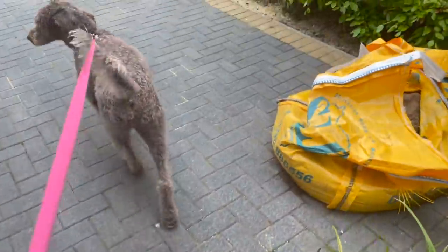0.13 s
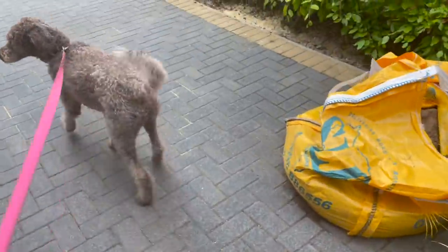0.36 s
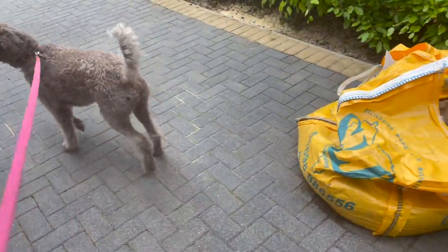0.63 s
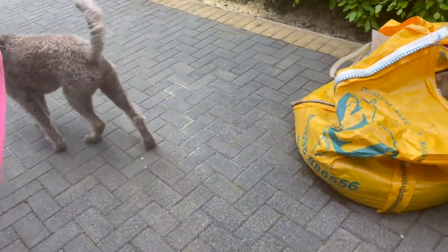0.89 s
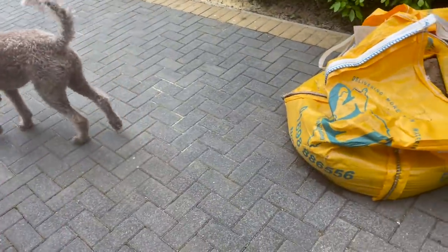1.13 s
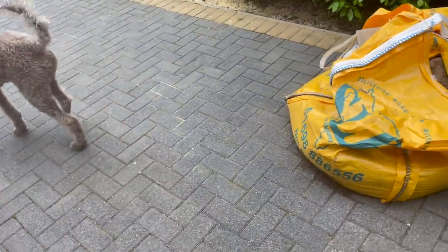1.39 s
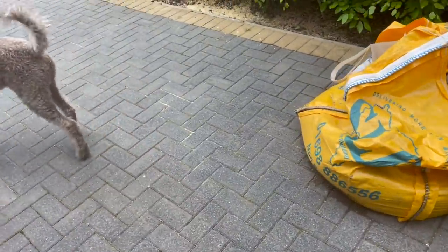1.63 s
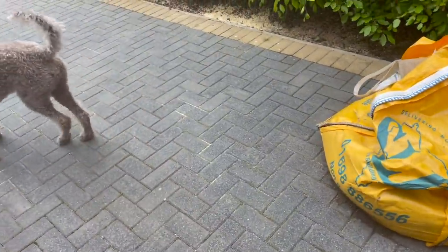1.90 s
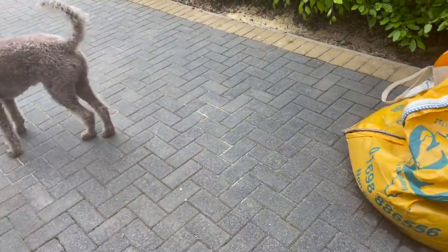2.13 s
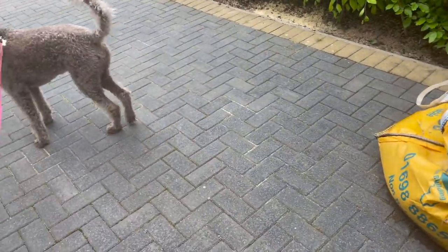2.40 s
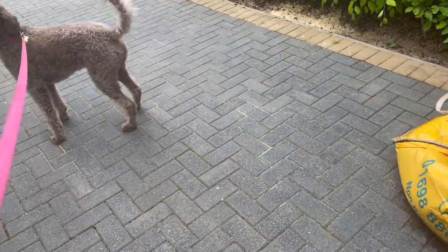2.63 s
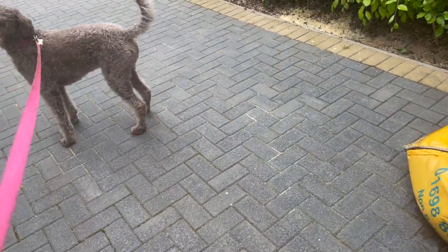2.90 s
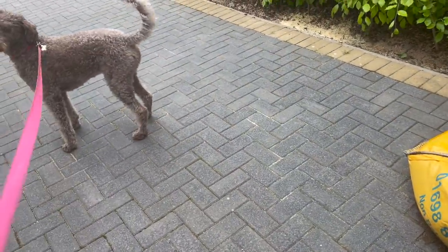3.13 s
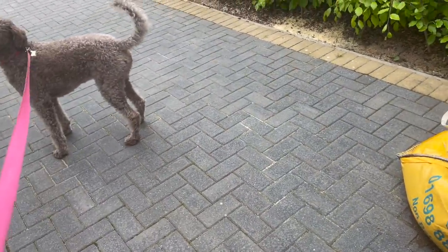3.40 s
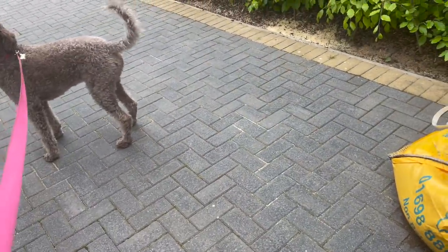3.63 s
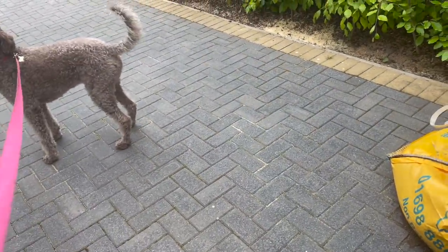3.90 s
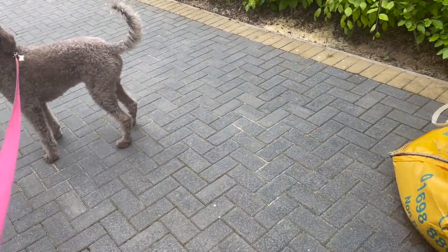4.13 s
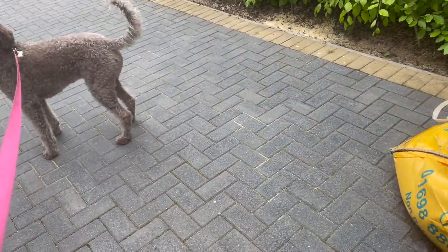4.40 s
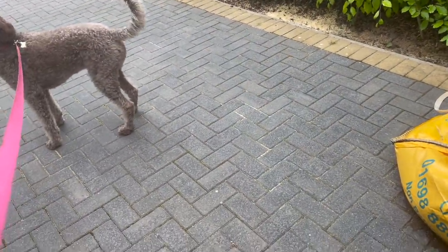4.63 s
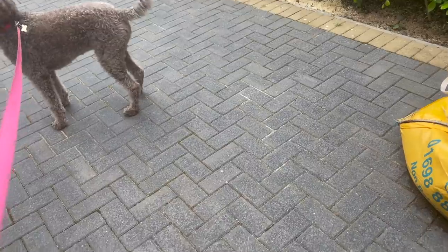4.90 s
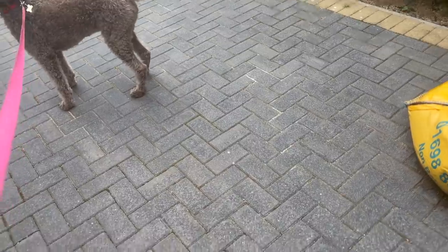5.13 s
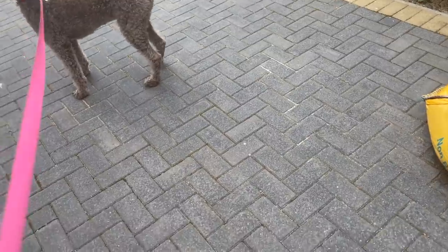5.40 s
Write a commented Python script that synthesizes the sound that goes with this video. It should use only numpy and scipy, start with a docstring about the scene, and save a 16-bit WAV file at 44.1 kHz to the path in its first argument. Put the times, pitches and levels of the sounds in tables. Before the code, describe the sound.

Irregular clicking taps and gritty scuffs of feet and dog paws on paving blocks outdoors, sparse mid-way, then crowding together near the end.

```python
"""A person and a dog shift about on paving blocks, close below a hand-held phone.
From the start, filtered-noise outdoor hiss, bass stirred by hand and wind, and dragged grit made of ringing grains.
At 0.1 s the fur swishes and taps begin: each tap is a click and crack, a spray of grit and small ringing stones.
A flurry with dull knocks (decaying sines) ends at 0.8 s; steps stay sparse until 3.3 s, a loose block rocking at 2.8 s.
Steps crowd together from 3.9 to 5.2 s, then dragging, bass and hiss are left until 5.5 s."""
import sys
import numpy as np
from scipy import signal
from scipy.fft import rfft, irfft
from scipy.io import wavfile
from scipy.ndimage import uniform_filter1d

SR = 44100
rng = np.random.default_rng(int(sys.argv[2]) if len(sys.argv) > 2 else 0)


def waveform_to_disk(signal):
    """Save audio, clipped to [-1, 1], as 16-bit WAV at the path in sys.argv[1]."""
    frames = np.transpose(np.atleast_2d(signal))
    scaled = np.clip(frames, -1, 1) * 32767
    samples = np.round(scaled).astype(np.int16)
    wavfile.write(sys.argv[1], SR, samples)


def how_loud(loudness_db):
    """Turn decibels into a plain amplitude multiplier (0 dB gives 1, 20 dB gives 10)."""
    steps = np.asarray(loudness_db, float) / 20
    return 10 ** steps


N = 243341
TIME = np.arange(N) / SR
BIN_HZ = np.maximum(np.arange(N // 2 + 1) * SR / N, 1)

# distant outdoor hiss, spectrum: f/Hz, gain/dB
AIR_SPECTRUM = [(88, -20.5), (150, -1), (240, -2.5), (1260, -7.5), (2180, -22), (3920, -6.5), (4860, -23),
                (8230, -33.5), (13200, -30), (16000, -52)]
# bass from the hand and the wind on the phone: t/s, level/dB, part above 100 Hz re level/dB
HANDLING = [(0.0, -64, 10), (0.3, -73.5, 13.5), (0.581, -54.5, -9), (0.78, -53.5, -6), (1.11, -65.5, -6),
            (1.35, -60.5, -8.5), (1.43, -53, 0.5), (1.69, -65.5, -1.5), (2.0, -60, -9), (2.55, -75, 6),
            (2.9, -60, -13), (3.05, -65, -31), (3.16, -58.5, -12), (3.6, -69, 2), (3.89, -63, -9),
            (4.06, -50, -3), (4.179, -60, 10), (4.28, -33, -6.5), (4.36, -49.5, 0), (4.45, -47, -5.5),
            (4.601, -52, 0), (4.72, -47, 0.5), (4.9, -45.5, 5), (5.1, -52.5, 7.5), (5.38, -51.5, -11),
            (5.52, -54.5, -7)]
# dragging soles and paws: t/s, level/dB, treble re level/dB
DRAG = [(0.0, -53.5, -4.5), (0.17, -65, -6), (0.34, -62, 6.5), (0.66, -66, -3), (0.85, -58, 3),
        (1.05, -69, 0.5), (1.3, -70, -7.5), (1.6, -71, -18.5), (2.01, -68.5, -2), (2.2, -74.5, -6),
        (2.4, -75.5, -1.5), (2.7, -79.5, -8), (2.86, -82, 2), (3.1, -75, -33), (3.44, -73, -20),
        (3.56, -50, -18.5), (3.72, -73.5, -18), (3.949, -68.5, -8), (4.08, -49, 0), (4.16, -57.5, -11.5),
        (4.32, -54.5, -16.5), (4.55, -71.5, -21.5), (4.88, -47, -13.5), (5.09, -54.5, -12.5),
        (5.29, -66.5, -10), (5.52, -71, -2)]
# colour of the crushed grit: f/Hz, gain/dB
GRIT_SPECTRUM = [(88, -26), (150, 4), (330, -4.5), (450, -7.5), (640, -5), (950, -1), (1830, -4.5),
                 (2300, -3), (3500, -7), (5500, -11), (7600, -16.5), (10000, -17), (13400, -19),
                 (16000, -32)]
# resonances of sole and block: f/Hz, width/Hz, gain/dB
BLOCK_MODES = [(354, 100, 3), (634.5, 3.3, 12.5), (1030, 6.9, 6.5), (1490, 48, -0.5), (2060, 60, 1),
               (2810, 36, 9.5), (4260, 180, -12), (4360, 170, 7.5), (7350, 41, 6)]
# soft bright swishes, fur or lead brushing past: t/s, level/dB, bite re level/dB, fade/dB per 50 ms
SWISHES = [(0.094, -49, -57, 10), (0.164, -46, -9, 23), (0.525, -46, -22, 37), (0.624, -47, -21, 27),
           (0.983, -47.5, -5, 46), (1.371, -56, -26, 8), (1.644, -55, -4, 26), (1.749, -59.5, -2, 25),
           (2.359, -65, 7, 29.5), (2.504, -57.5, -6, 34), (2.554, -55, -5.5, 12.5), (2.612, -59, 1, 28.5),
           (3.284, -69.5, -5, 19), (3.473, -57, 0, 32)]
# footfalls and claw ticks: t/s, level/dB, ring f/Hz, treble re level/dB, fade/dB per 50 ms
STEPS = [(0.095, -50, 1390, 5.5, 31), (0.212, -44.5, 1020, -24, 31.5), (0.276, -35, 2810, -22, 28),
         (0.286, -16.5, 2820, -10.5, 20), (0.299, -25.5, 2990, -24, 13), (0.351, -26.5, 1470, -11.5, 20.5),
         (0.444, -38.5, 870, -17, 35), (0.502, -39.5, 1057, -20, 52), (0.679, -30, 960, -23, 13.5),
         (0.752, -22.5, 1940, -39.5, 13.5), (0.788, -21.5, 1030, -16.5, 20), (0.8, -26, 1090, -27, 15),
         (1.409, -52, 2120, -24, 3), (1.47, -41.5, 717, -36, 8), (1.502, -57, 1020, -16, 30),
         (1.884, -22.5, 1555, -23, 17.5), (2.055, -35, 1080, -23, 12), (2.099, -37.5, 1030, -22, 27),
         (2.623, -43.5, 1940, -10.5, 59), (2.772, -40, 2043, -47, 17), (2.858, -46.5, 1090, -32, 16),
         (3.145, -53, 900, -48, 28), (3.308, -54, 1690, -18, 31), (3.401, -27, 2270, -55, 21),
         (3.441, -35.5, 2230, -45, 17), (3.459, -38.5, 1002, -37, 19.5), (3.544, -43.5, 4300, -30, 11),
         (3.57, -35, 2270, -35, 15), (3.592, -26, 1520, -42, 19.5), (3.912, -25, 2336, -14.5, 9),
         (3.953, -24, 790, -26, 7), (3.976, -18.5, 1004, -12, 21), (4.0, -22.5, 2163, -19, 10.5),
         (4.03, -25.5, 1030, -23, 33), (4.047, -23, 1970, -18, 32), (4.06, -20.5, 1020, -27, 28),
         (4.082, -28.5, 1030, -28, 30), (4.183, -15.5, 2060, -24.5, 33), (4.191, -23, 2170, -22.5, 17),
         (4.228, -29, 1525, -19.5, 15.5), (4.268, -28.5, 1490, -39.5, 27), (4.36, -36.5, 2110, -40.5, 30),
         (4.518, -38, 1400, -16, 13), (4.664, -45, 2100, -36, 43), (4.696, -13.5, 2106, -17, 12),
         (4.728, -19, 1466, -20, 40), (4.742, -20, 650, -19, 16.5), (4.784, -23.5, 1400, -21, 34),
         (4.865, -27, 1390, -21.5, 27), (4.97, -28, 2215, -46, 40), (5.03, -31, 1500, -36, 21),
         (5.079, -36.5, 1380, -35, 60), (5.176, -42, 685, -35, 23)]
# dull knocks: t/s, level/dB, f/Hz, t60/s
KNOCKS = [(.292, -23.5, 291.5, 0.093), (0.622, -15, 134, 0.034), (1.471, -35.5, 428, 0.13),
          (4.196, -11, 162, 0.043)]
# a loose block rocks under some steps: t/s, level/dB
LOOSE_BLOCK = [(2.776, -49), (3.405, -39.5), (4.186, -26.5), (4.719, -29)]
# stereo width of two microphone ports: f/Hz, side re mid/dB
WIDTH = [(30, -25), (125, -17), (250, -14.5), (500, -4.5), (1000, -2.5), (2000, -11.5), (4000, -4),
         (6000, -5.5), (8000, -2), (10500, 0), (12500, -5), (14000, -4), (16000, -0.5)]
# how the side follows the mid: f/Hz, share in step, share a quarter cycle ahead
PORT_PHASE = [(60, .05, .3), (250, .45, .3), (614, 0.45, 0.5), (1200, 0.49, 0.35), (2360, 0.21, 0.24),
              (4450, .05, 0.68), (8000, 0.034, 0.64), (13000, .05, 0.65)]
# the ports oppose each other here: f/Hz, mid gain/dB
CANCEL = [(7600, -2.5), (8300, -7.5), (8900, -21), (10700, -20.5), (11500, -9), (12200, -6), (15000, 4),
          (16200, -16)]

SPRAY_DB = -3.5  # grit thrown by a footfall, re its tap


def along(table, column=1):
    """A spectrum column at every bin, straight on a log-frequency axis."""
    table = np.array(table, float)
    return np.interp(np.log(BIN_HZ), np.log(table[:, 0]), table[:, column])


def shape(x, gain):
    """Filter by a gain per bin."""
    return irfft(rfft(x) * gain, N)


def band(lo_hz, hi_hz):
    """Gain of a steep band-pass."""
    return 1 / np.sqrt((1 + (lo_hz / BIN_HZ) ** 8) * (1 + (BIN_HZ / hi_hz) ** 8))


def unit(x):
    """Scale to rms 1."""
    return x / np.sqrt(np.mean(x ** 2))


def walk(rate):
    """Random wander: levels held for 1 / rate seconds, slewed twice, rms 1."""
    hold = int(SR / rate)
    levels = np.repeat(rng.standard_normal(N // hold + 1), hold)
    slewed = uniform_filter1d(uniform_filter1d(levels, hold), hold)
    return unit(slewed[:N])


def ring(x, hz, width):
    """One resonance, gain 1 at its centre."""
    return signal.lfilter(*signal.iirpeak(hz, hz / width, SR), x)


def fall(s, t60, rise):
    """Span of samples from s on, its own clock, and a fast rise with an exponential fall."""
    start = int(s * SR)
    t = TIME[:min(int(1.5 * t60 * SR) + 64, N - start)]
    env = (1 - np.exp(-t / rise)) * np.exp(-np.log(1000) * t / t60)
    return slice(start, start + len(t)), t, env


def lasting(fade_db):
    """Seconds to fall 60 dB at this fade per 50 ms, the fade kept within 6 to 90 dB."""
    return 60 * 0.05 / np.clip(fade_db, 6, 90)


def air():
    """Distant outdoor hiss: coloured noise whose level drifts a little."""
    hiss = unit(shape(rng.standard_normal(N), how_loud(along(AIR_SPECTRUM))))
    return hiss * how_loud(-69.5 + 2.9 * walk(6.3))


def shaking():
    """Levels of the low and the upper bass in dB, each wandering in quick gusts."""
    gust_db, gust_hz = 0.5, 8.0
    s, db, upper_db = np.transpose(HANDLING)
    return [np.interp(TIME, s, level) + gust_db * walk(gust_hz) for level in (db, db + upper_db)]


def handling(low_db, upper_db, weight):
    """Noise rumble from hand and wind; the weight on the ground adds thuds to the upper bass."""
    thud_db = -3.5  # re the weight layer
    low = unit(shape(rng.standard_normal(N), band(44, 98) ** 2))
    upper = unit(shape(rng.standard_normal(N), band(100, 206)))
    return low * how_loud(low_db) + upper * np.hypot(how_loud(upper_db), how_loud(thud_db) * weight)


def dragging(hand_db):
    """Power of weight, body, bite and treble as soles and paws drag; the hand's bass leaks into the weight."""
    s, db, treble_db = np.transpose(DRAG)
    # weight, body, bite: dB re level, and dB per dB of treble
    rel_db = [colour + tilt * treble_db for colour, tilt in ((-7.5, 0.1), (1, -0.055), (-2.5, 0.1))]
    power = np.array([how_loud(np.interp(TIME, s, db + rel)) ** 2 for rel in rel_db + [treble_db]])
    power[0] += how_loud(hand_db - 9) ** 2
    return power


def grit(crunch_db, own_db):
    """Grains crack in quick bunches, each size at its own pitch; returns weight, body, bite and treble."""
    bunches = crunch_db * walk(400)
    grains = 0
    for hz in 160 * 2 ** np.arange(0, 6.7, 1 / 3):  # third octaves
        cracks = rng.standard_normal(N) * how_loud(bunches + own_db * walk(60 + hz / 20))
        grains = grains + ring(cracks, hz, hz / 5)
    modes = 1
    for hz, width, db in BLOCK_MODES:
        modes = modes + (how_loud(db) - 1) / (1 + ((BIN_HZ - hz) * 2 / width) ** 2)
    x = shape(grains, how_loud(along(GRIT_SPECTRUM)) * modes)
    # the treble is scaled by its lower part alone
    treble = shape(x, band(5830, 14000)) / shape(x, band(5270, 7400)).std()
    lower = [unit(shape(x, band(*edges))) for edges in ((190, 570), (570, 1600), (1600, 4300))]
    return lower + [treble]


def swishes():
    """Grit-layer power of fur or lead brushing past: bite and treble swell softly and fade."""
    power = np.zeros((4, N))
    for s, db, bite_db, fade_db in SWISHES:
        span, t, env = fall(s, lasting(fade_db), 0.0057)
        power[2:, span] += (how_loud(db + np.array([[bite_db], [0]])) * env) ** 2
    return power


def sprays():
    """Grit-layer power thrown by each footfall: a brush beforehand, the spray, and a settling trickle."""
    settle_db, settle_t60_s = -31, 0.8  # level re the tap
    power = np.zeros((4, N))
    for s, db, hz, treble_db, fade_db in STEPS:
        tilt_db = 2.3 * np.log2(hz / 1600)  # a higher tap throws finer grit
        # dB re the tap, rise in s, stretch of the fade: the weight lands slowly and lingers
        layers = ((SPRAY_DB - 17.5, 0.008, 1.4),
                  (SPRAY_DB - 7.0 - tilt_db, 0.002, 1.1),
                  (SPRAY_DB - 9.5 + tilt_db, 0.001, 1.0),
                  (treble_db, 0.0005, 1.1))
        for row, (rel_db, rise, stretch) in enumerate(layers):
            span, t, env = fall(s, stretch * lasting(fade_db), rise)
            power[row, span] += (how_loud(db + rel_db) * env) ** 2
        span, t, env = fall(s, settle_t60_s, 0.036)
        power[:3, span] += (how_loud(db + settle_db) * env) ** 2
        # the sole brushes the grit for a moment before it lands
        lead = slice(span.start - 700, span.start)
        power[1:3, lead] += (how_loud(db - 16) * np.exp((TIME[lead] - s) / 0.0038)) ** 2
    return power


def taps():
    """The first contact cracks broadly and clicks a few cycles at its own pitch."""
    crack_db, lift_s = 4.5, 0.15  # a foot lifted for a while lands with a harder crack
    click, crack, hiss = np.zeros((3, N))
    noise = np.sign(rng.standard_normal(N))
    gaps = np.diff(np.array(STEPS)[:, 0], prepend=0)
    harder_db = crack_db * (1 - np.exp(-gaps / lift_s))
    phases = rng.random(len(STEPS))  # in turns
    for (s, db, hz, treble_db, _), hard_db, phase in zip(STEPS, harder_db, phases):
        span, t, env = fall(s, 0.02, 0.00027)
        click[span] += how_loud(db + hard_db) * env * np.sin(2 * np.pi * (hz * t + phase))
        span, t, env = fall(s, 0.023, 0.00026)
        crack[span] += how_loud(db + hard_db + 2) * env * noise[span]
        hiss[span] += how_loud(db + treble_db) * env * noise[span]
    return click + shape(crack, band(1200, 3660)) + shape(hiss, band(6800, 14000))


def rubbing(stones):
    """The grit under each step keeps the pitch of its tap sounding, and two small stones ring near it."""
    out = np.zeros(N)
    rub = rng.standard_normal(N) * how_loud(3.5 * walk(200))
    for (s, db, hz, _, fade_db), octaves in zip(STEPS, stones):
        span, t, env = fall(s, 1.07 * lasting(fade_db), 0.0026)
        # f/Hz, width/Hz, level re the spray/dB
        pitches = [(hz, 170.0, -7)] + [(hz * 2 ** octave, 110, -10) for octave in octaves]
        for f, width, rel_db in pitches:
            tone = unit(ring(ring(rub[span], f, width), f, width))
            out[span] += how_loud(db + SPRAY_DB + rel_db) * env * tone
    return out


def knocks(hits):
    """Dull knocks: each a softly struck, decaying sine."""
    out = np.zeros(N)
    for s, db, hz, t60 in hits:
        span, t, env = fall(s, t60, 0.0079)
        out[span] += how_loud(db) * env * np.sin(2 * np.pi * hz * t)
    return out


def loose_block():
    """A loose block rocks under some steps, knocking at one fixed pitch."""
    pitch_hz, t60_s = 368, 0.24
    return knocks([(s, db, pitch_hz, t60_s) for s, db in LOOSE_BLOCK])


def ports(near, other):
    """Left and right: the side is partly the same wave, shifted, and partly an unrelated one off the ground."""
    same = np.clip(along(PORT_PHASE, column=1), 0, 0.7)
    ahead = np.clip(along(PORT_PHASE, column=2), 0, 0.7)
    width = how_loud(along(WIDTH))
    side = shape(near, width * (same + 1j * ahead))
    side = side + shape(other, width * np.sqrt(1 - same ** 2 - ahead ** 2))
    mid = shape(near, how_loud(along(CANCEL)))
    return np.array([mid + side, mid - side])


def scene():
    """Feet and air feed both waves at the ports; handling and knocks join the near wave only."""
    low_db, upper_db = shaking()
    force = np.sqrt(dragging(upper_db) + swishes() + sprays())
    tap = taps()
    # two stones per step, in octaves from its tap
    stones = 0.3984 + 0.8 * np.clip(rng.standard_normal((len(STEPS), 2)), -2, 2)
    near, other = ((force * grit(crunch_db=1.5, own_db=1.5)).sum(axis=0) + rubbing(stones) + air()
                   for _ in range(2))
    bass = handling(low_db, upper_db, force[0]) + knocks(KNOCKS) + loose_block()
    late_tap = np.roll(tap, 130)  # 2.9 ms later
    return ports(near + tap + bass, other + late_tap)


def low_pass(x):
    """Removes everything above the highest recorded frequency."""
    return signal.sosfilt(signal.butter(12, 16500, fs=SR, output="sos"), x)


def record(dry):
    """The finished mix as the phone delivers it."""
    return low_pass(dry)


dry = scene()
out = record(dry)
waveform_to_disk(out)
```